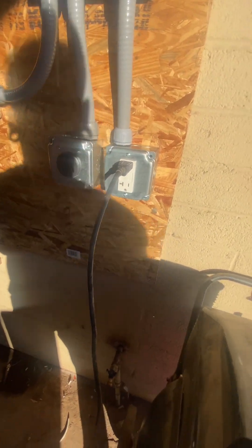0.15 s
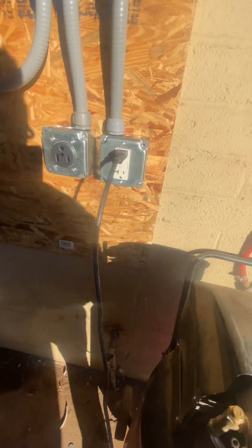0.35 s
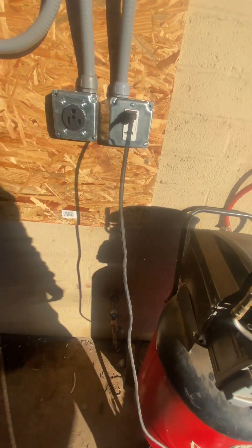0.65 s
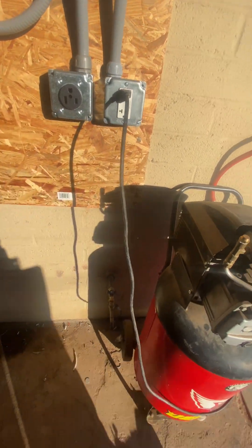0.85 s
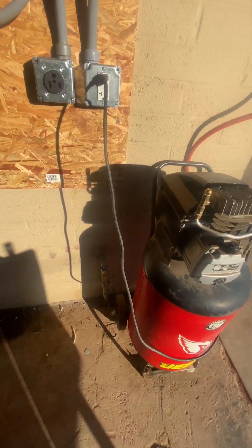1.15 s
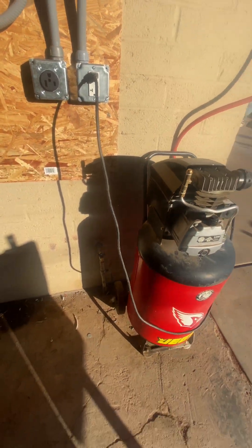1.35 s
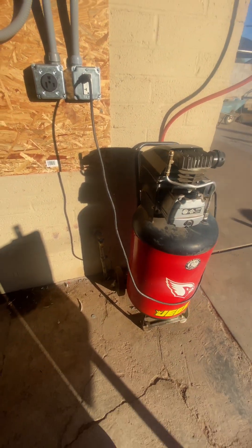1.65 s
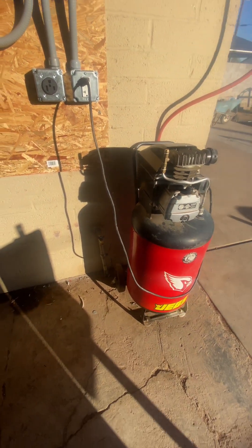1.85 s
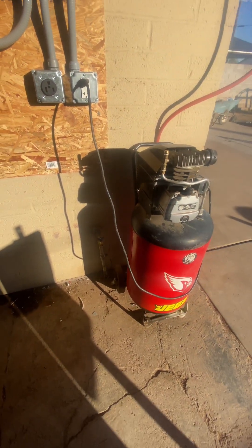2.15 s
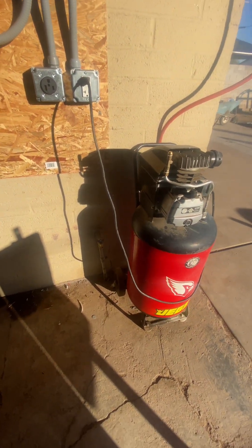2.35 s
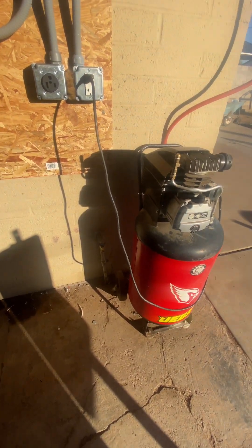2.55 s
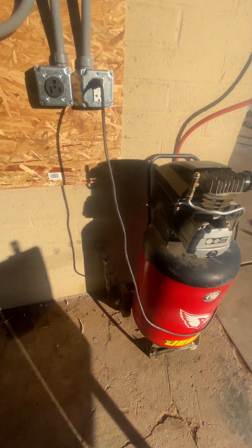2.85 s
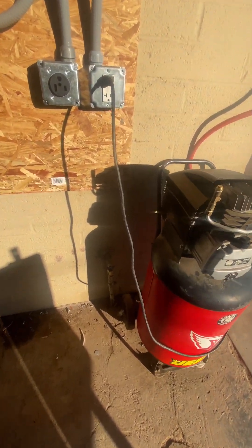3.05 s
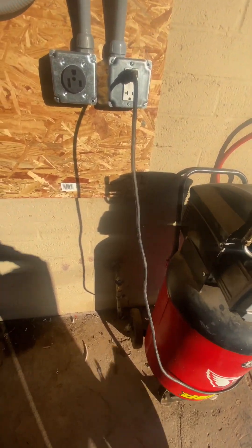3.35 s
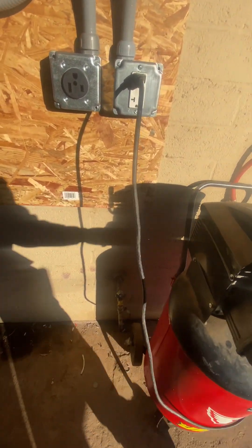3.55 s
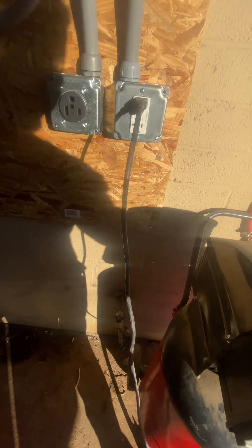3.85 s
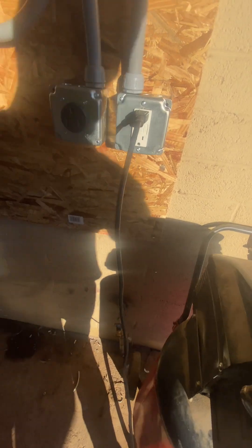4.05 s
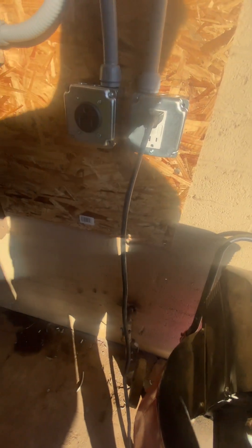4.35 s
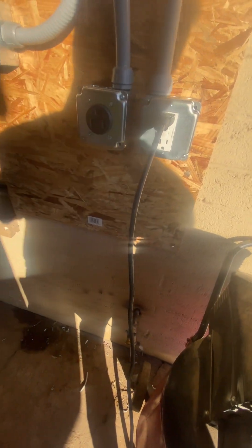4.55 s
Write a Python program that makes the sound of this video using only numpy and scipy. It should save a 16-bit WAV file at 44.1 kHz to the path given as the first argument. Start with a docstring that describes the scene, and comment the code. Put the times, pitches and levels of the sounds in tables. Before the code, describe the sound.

Continuous mechanical roar from a compressor against a hard wall, heard by a handheld microphone. Rapid pump pulses make a steady droning hum; valves rattle metallically and air hisses on top, with a faint thin whine beneath. The sound drops as the listener backs away, holds even, then swells again when they walk back close. A soft footstep is nearly buried.

```python
"""Piston air compressor in a garage

A small compressor runs steadily against a wall, 57 turns a second; one crank phase times its pulsed sounds.
Each turn brings three gulps of air (hum, buzz and rasp), seven blows that ring the metal head, a gush of
hiss and a singing outlet reed. A thin shaft whine, fan wash and one soft footfall lie beneath.
The listener stands by the wall socket, steps back, and returns to a slightly different place."""
import sys
import numpy as np
from scipy import signal
from scipy.fft import rfft, irfft, next_fast_len
from scipy.io import wavfile
from scipy.ndimage import uniform_filter1d, map_coordinates

SR = 44100
rng = np.random.default_rng(int(sys.argv[2]) if len(sys.argv) > 2 else 0)


def master_out(mix):
    """Clip the mix to full scale and print it as 16-bit PCM to the path in sys.argv[1]."""
    frames = np.transpose(np.atleast_2d(mix))
    ceiling = np.clip(frames, -1, 1)
    pcm = np.round(ceiling * 32767).astype(np.int16)
    wavfile.write(sys.argv[1], SR, pcm)


N = 207578
TIME = np.arange(N) / SR
TURNS_HZ = 56.88

# listener's walk: time_s, place (0 by the socket, 1 stepped back, 2 returned)
WALK = [(0, 0), (.28, 0.026), (.72, 0.48), (1.2, 0.76), (1.6, 0.83), (2.45, 0.96), (3.3, 1.58),
        (4.03, 1.903), (4.7, 1.79)]
# machine loudness, higher as the listener is nearer: time_s, level_db
LOUDNESS = [(0.12, -18.5), (0.25, -17.5), (0.75, -18.5), (1.2, -22), (2.88, -22.5), (3.24, -20),
            (4.15, -18.5), (4.6, -19.5)]
# gulps of air in each turn: at_turns, level_db
GULPS = [(0.96, 0), (.385, -4), (.66, -5)]


def gain_of(db):
    """Decibels to amplitude."""
    return 10 ** (np.asarray(db) / 20)


def evened(x):
    """Scales to rms 1."""
    return x / np.sqrt(np.mean(x ** 2) + 1e-20)


def levelled(x):
    """Holds the rms near 1 over a span of about ten turns."""
    span = round(10 * SR / TURNS_HZ)
    power = uniform_filter1d(uniform_filter1d(x ** 2, span), span)
    return x / np.sqrt(power + 1e-12)


def whitened(x, width_hz=260):
    """Evens out the broad colour of a sound and keeps its harmonics and rhythm."""
    spectrum = rfft(x, 2 * N)
    power = uniform_filter1d(abs(spectrum) ** 2, round(width_hz * 2 * N / SR))
    return irfft(spectrum / np.sqrt(abs(power) + 1e-9))[:N]


def follow(rows):
    """Breakpoints (time_s, value) joined into a curve at every sample."""
    return np.interp(TIME, *np.transpose(rows))


def read(hz, points_hz, values):
    """A spectrum joined by straight lines on a log-frequency axis."""
    return np.interp(np.log(hz + 1), np.log(points_hz), values)


def drift(rate_hz):
    """Slow random fluctuation of rms 1: noise low-passed near rate_hz."""
    size = next_fast_len(N, True)
    hz = np.fft.rfftfreq(size, 1 / SR)
    spectrum = rfft(rng.standard_normal(size)) / (1 + (hz / rate_hz) ** 4)
    return evened(irfft(spectrum, size)[:N])


def causal(db):
    """Minimum-phase response of a passive body with these gains."""
    log_gain = np.log(gain_of(np.r_[db, db[-2:0:-1]]))
    return np.exp(np.conj(signal.hilbert(log_gain)))[:len(db)]


def nearness():
    """Weight of each of the three places at every moment."""
    place = np.clip(follow(WALK), 0, 2)
    return np.maximum(1 - abs(place - np.arange(3)[:, None]), 0)


def stretches(count=8):
    """Equal-power fades between successive stretches of the walk."""
    along = np.clip(follow(WALK), 0, 2) / 2 * (count - 1)
    return np.sqrt(np.maximum(1 - abs(along - np.arange(count)[:, None]), 0))


def crank(wander_turns=0.00056):
    """Crank turns as they reach the ear: slightly unsteady, and later from farther away."""
    # distance from the pump: time_s, distance_m
    distance = [(0, .8), (.5, .98), (1, 1.16), (1.5, 1.26), (2, 1.28), (2.5, 1.16), (3, .96), (3.5, .8),
                (4, .68), (4.7, .57)]
    delay_s = (follow(distance) - distance[0][1]) / 343
    return TURNS_HZ * (TIME - delay_s) + wander_turns * drift(44)


def hum_level(bass_db=-19, hum_share=0.36, wall_db=5, wall_steepness=3.6):
    """Deep sound fills the garage, so it follows the loudness only in part and piles up by the wall."""
    by_wall = np.minimum(abs(follow(WALK) - 1), 1) ** wall_steepness
    return bass_db + hum_share * follow(LOUDNESS) + wall_db * by_wall


def footfall(at_s=0.82, length_s=0.097, step_db=-42, low_hz=70, high_hz=260):
    """A soft, dull step backwards: band-passed noise under a bell-shaped envelope."""
    band = signal.butter(2, [low_hz, high_hz], "band", fs=SR, output="sos")
    thud = signal.sosfilt(band, rng.standard_normal(N))
    return evened(thud) * gain_of(step_db) * np.exp(-((TIME - at_s) / length_s) ** 2)


def fan(fan_db=-42, closeness=0.34):
    """Broad noise wash of cooling air, following the hum level in part."""
    # fan spectrum: pitch_hz, relative_level_db
    fan_colour = [(20, -25), (40, -19), (80, -4.5), (200, -7), (400, -2), (750, -4.5), (1100, -2),
                  (2000, -11.5), (3500, -6), (8000, -72)]
    hz = np.fft.rfftfreq(N, 1 / SR)
    level_db = hum_level()
    wash = irfft(rfft(rng.standard_normal(N)) * gain_of(read(hz, *np.transpose(fan_colour))), N)
    return evened(wash) * gain_of(fan_db + closeness * (level_db - level_db.mean()))


def whine(turns, order=81, waver=0.4):
    """A thin, wavering sine that keeps step with the shaft."""
    # whine level: time_s, level_db
    whine_level = [(0, -47), (.3, -29), (.6, -31), (.95, -34), (1.3, -41), (3.5, -34), (4.05, -40),
                   (4.7, -34)]
    tone = (1 + waver * drift(8.9)) * np.sin(2 * np.pi * order * turns)
    return evened(tone) * gain_of(follow(whine_level))


def rasp(turns, rasp_db=-42, low_hz=500, high_hz=1150, lasts_turns=0.12, back_db=-12):
    """Each gulp tears at the intake with a decaying burst of noise, weaker where the listener steps back."""
    gate = sum(gain_of(db) * np.exp(-((turns - at) % 1) / lasts_turns) for at, db in GULPS)
    band = signal.butter(3, [low_hz, high_hz], "band", fs=SR, output="sos")
    noise = signal.sosfilt(band, gate * rng.standard_normal(N))
    return evened(noise) * gain_of(rasp_db + back_db * nearness()[1])


def dead_spots(hz, dead_width_hz=45):
    """Dips in dB where one pitch of the hum meets its own echo out of step."""
    # dead spots: time_s, half_width_s, pitch_hz, depth_db
    spots = [(.1, 0.16, 457, -12), (.63, 0.13, 736, -4), (1.25, 0.11, 683, -7), (1.4, 0.46, 853, -1),
             (2, .4, 836, -6.5), (3.3, 0.3, 377, -10), (3.57, 0.24, 442, -9), (3.57, 0.16, 580, -9)]
    return sum(db * np.exp(-((TIME - s) / width_s) ** 2 - ((hz - at_hz) / dead_width_hz) ** 2)
               for s, width_s, at_hz, db in spots if abs(hz - at_hz) < 2 * dead_width_hz)


def hum(turns, scatter_rad=.24, smear_rad=.003, waver=0.049, flutter=0.026, order=16):
    """The pump gulps air; muffler, tank and wall shape and smear the pulses differently at each place."""
    # harmonics at each place: multiple of the turning rate, relative_level_db
    at_socket = [(1, -14.5), (2, -13.5), (3, -10), (4, -12.5), (5, -20), (6, -2), (7, -30), (8, -8),
                 (9, -10.5), (10, -4), (11, -12.5), (12, -5), (13, -15), (14, -12.5), (15, -4), (16, -13),
                 (17, -19), (18, -28), (19, -20), (20, -26), (21, -15.5), (22, -15), (23, -20), (24, -25),
                 (25, -18), (26, -29), (27, -18.5)]
    stepped_back = [(1, -13.5), (2, -21.5), (3, -6), (4, -2), (5, -10), (6, -2.5), (7, -11), (8, 3),
                    (9, -4), (10, -5.5), (11, -21), (12, -11), (13, -5.5), (14, -7.5), (15, -3),
                    (16, -11.5), (17, -22), (18, -4.5), (19, -15.5), (20, -17), (21, -24), (22, -16.5),
                    (23, -13), (24, -20), (25, -17), (26, -28), (27, -15)]
    returned = [(1, -9.5), (2, -6), (3, -6.5), (4, -6), (5, -10), (6, 4), (7, -13.5), (8, -9), (9, -0.5),
                (10, -3.5), (11, -1), (12, 1.5), (13, -2.5), (14, -1.5), (15, -9), (16, -0.5), (17, -2.5),
                (18, -9.5), (19, -25), (20, -3), (21, 0.5), (22, -9.5), (23, -5), (24, -17), (25, -9),
                (26, -22), (27, -7)]
    # level of the buzz, beamed by the intake towards the way back: time_s, level_db
    buzz_level = [(0, -33.5), (.5, -37), (1.2, -39.5), (2.3, -39.5), (2.9, -35), (3.4, -31), (4.1, -31.5),
                  (4.7, -31.5)]
    places_db = np.array([at_socket, stepped_back, returned])[:, :, 1]
    near, tones = nearness(), []
    for k, db in enumerate(places_db.T, 1):
        pulses = sum(gain_of(gulp_db) * np.exp(-2j * np.pi * k * at) for at, gulp_db in GULPS)
        echoes = scatter_rad * np.sqrt(k) * rng.standard_normal(3) @ near  # short waves scatter most
        phase = np.angle(pulses) + echoes - smear_rad * k ** 2  # the muffler lets high harmonics out last
        size = gain_of(db @ near + dead_spots(k * TURNS_HZ)) * (1 + waver * drift(9.1))
        tones.append(size * np.cos(2 * np.pi * k * turns + phase))
    # low harmonics spread all round; higher ones beam from the intake as a buzz
    low = levelled(sum(tones[:order])) * gain_of(hum_level())
    buzz = levelled(sum(tones[order:])) * gain_of(follow(buzz_level))
    return (low + buzz) * (1 + flutter * drift(39))


def reed(turns, reed_hz=10318, opens_turns=.4, lasts_turns=0.64, scatter_rad=.2, swell_db=1.5):
    """The outlet reed sings while air passes it, starting afresh in every turn and dying slowly."""
    # tone before the head is levelled, level_db: by the socket, stepped back, returned
    places_db = [-12.5, -18.5, -5.5]
    turn, angle = np.divmod(turns - opens_turns + 1, 1)
    phase, force_db = rng.standard_normal((int(turn.max()) + 1, 2))[turn.astype(int)].T
    lift = np.sin(np.pi * np.minimum(angle / lasts_turns, 1) ** .5) ** 2
    tone = np.sin(2 * np.pi * reed_hz * angle / TURNS_HZ + scatter_rad * phase)
    swell = gain_of(0.5 * force_db + swell_db * drift(6.4))
    return evened(lift * swell * tone) * gain_of(places_db @ nearness())


def gush(turns, corner_hz=8000):
    """Air hisses through the valves: high-passed noise gated by crank angle."""
    # rush of air through one turn: at_turns, relative_level_db
    rush = [(0, -8.5), (.25, -4.5), (.31, -4.5), (.46, -9), (.57, -1.5), (.62, -12.5), (.83, -11), (1, -6)]
    highpass = signal.butter(1, corner_hz, "high", fs=SR)
    hiss = signal.lfilter(*highpass, rng.standard_normal(N))
    return evened(hiss * gain_of(np.interp(turns % 1, *np.transpose(rush))))


def metal(t60_s, centre_hz, octaves):
    """The dense decaying ring of cast metal, strongest around one pitch."""
    t, hz = np.arange(2048) / SR, np.fft.rfftfreq(2048, 1 / SR)
    focus_db = -20 * np.log10(1 + (np.log2((hz + 1) / centre_hz) / octaves) ** 2 / 2)
    grains = rng.choice([-1., 1.], len(t)) * gain_of(-60 * t / t60_s)
    ring = irfft(rfft(grains) * causal(focus_db))
    return ring / np.linalg.norm(ring)


def blows(turns, uneven_db=1.0):
    """Valves and piston strike at set crank angles, never quite alike; the ring varies with direction."""
    # blows: at_turns, relative_level_db, ring_t60_s, timing_scatter_us, pitch_hz, spread_octaves
    strikes = [(0.041, -6.5, 0.023, 6.4, 7700, 0.77), (.295, -3, .014, 13, 7350, 0.55),
               (0.344, -5.5, 0.029, 17.4, 4520, .45), (.39, -9, 0.031, 27, 2330, 0.82),
               (.6, -2, 0.018, 12.4, 6330, 0.51), (0.656, -5, 0.028, 12, 4860, 0.51),
               (.78, -7, 0.034, 25, 2500, 0.98)]
    out, around, fades = np.zeros(N), np.arange(-12, 13), stretches()
    for angle, db, t60_s, scatter_us, centre_hz, octaves in strikes:
        at = np.interp(np.arange(max(angle, .03), turns[-1], 1), turns, np.arange(N))
        late, force = rng.standard_normal((2, len(at)))
        at = at + late * scatter_us * SR / 1e6
        # sinc pulses place each blow between samples
        index, train = at.astype(int)[:, None] + around, np.zeros(N + 64)
        pulses = np.sinc(index - at[:, None]) * gain_of(db + uneven_db * force)[:, None]
        np.add.at(train, index, pulses)
        for fade in fades:
            out += signal.oaconvolve(train[:N] * fade, metal(t60_s, centre_hz, octaves))[:N]
    return evened(out)


def walls(x, echo=0.19, shift_s=0.000504, count=5):
    """Floor, wall and tank echo the clatter; the paths slide against each other as the listener moves."""
    out, near = x.copy(), nearness()
    for delay_s in np.geomspace(.0016, .006, count):
        path_s = delay_s + shift_s * (rng.standard_normal(3) @ near + 0.09 * drift(1.19))
        out += echo * map_coordinates(x, [(TIME - path_s) * SR], order=3)
    return out


def fin(drive, centre_hz, width_hz, level_db, slope_db, lobe_at, lobe_spacing, echo):
    """A broad resonance rung by the clatter; with its wall echo it forms lobes that the walk crosses."""
    edges_hz = [centre_hz - width_hz / 2, centre_hz + width_hz / 2]
    band = signal.butter(2, edges_hz, "band", fs=SR, output="sos")
    place = follow(WALK)
    lobes = abs(1 + echo * np.exp(2j * np.pi * (place - lobe_at) / lobe_spacing))
    return levelled(signal.sosfilt(band, drive)) * lobes * gain_of(level_db + slope_db * place)


def clatter(turns, hiss_db=-2.5, head_db=-0.5):
    """Blows and hiss ring the head and its fins; the resonances beam differently towards each place."""
    # broad colour: pitch_hz, socket_db, back_db, returned_db
    colour = np.array([(1335, -26.5, -33, -25), (1642, -4.5, -1, -4.5), (2200, -5, -3, -6),
                       (2440, -3, -4, 1), (2890, -8.5, -5.5, -5), (3420, -5.5, -3, -8),
                       (3740, -1, 3.5, 3.5), (5300, 3.5, -1.5, 0.5), (5700, -4.5, 2, -2), (7800, 1, -2, -1),
                       (10200, -2.5, 2, -1), (12750, -6.5, -12.5, -8), (13300, -12.5, -15, -13),
                       (15300, -26, -29, -25.5)])
    # resonances of head, fins and pipe: pitch_hz, width_hz, socket_db, back_db, returned_db
    modes = [(3630, 220, 2.5, -2, 4.5), (4600, 230, 1, 2, 2), (5530, 190, -2, 5.5, 5.5),
             (6760, 21, 7, 4.5, 5), (8350, 160, 2, 7.5, 6.7), (9730, 70, 8, 3.7, 11),
             (10430, 110, 9, 0.5, 5.5), (10300, 99, -5, 9.5, 6.5), (11430, 79, 7, 3.3, 3.5),
             (12500, 70, -3, 3.5, 5.2), (13650, 200, 8, 4, 5.8)]
    # ringing fins: pitch_hz, width_hz, level_db, slope_db per place, lobe_at (place),
    # lobe_spacing (places), wall_echo (0-1)
    fin_rows = [(3755, 540, -18, -1, 0.29, 1.36, 0.73), (5790, 340, -15, -4.5, 0.012, 0.497, 1)]
    drive = whitened(walls(blows(turns) + gain_of(hiss_db) * gush(turns)))
    hz, head = np.fft.rfftfreq(8192, 1 / SR), np.zeros(N)
    for place, near in enumerate(nearness()):
        peaks = sum((gain_of(heights_db[place]) ** 2 - 1) / (1 + (2 * (hz - f) / width_hz) ** 2)
                    for f, width_hz, *heights_db in modes)
        broad_db = read(hz, colour[:, 0], colour[:, place + 1])
        db = broad_db + 10 * np.log10(np.maximum(1 + peaks, .1))
        head += near * evened(signal.oaconvolve(drive, irfft(causal(db)))[:N])
    head = levelled(head + reed(turns)) * gain_of(head_db)
    return (head + sum(fin(drive, *row) for row in fin_rows)) * gain_of(follow(LOUDNESS))


def scene():
    """One crank drives hum, rasp, clatter and whine; fan and footfall run free."""
    turns = crank()
    return (fan() + footfall() + whine(turns) + rasp(turns) + hum(turns) + clatter(turns))[None]


def record(dry, cutoff_hz=15500):
    """The recorder's band limit: a steep linear-phase low-pass."""
    lowpass = signal.firwin(511, cutoff_hz, window=("kaiser", 9), fs=SR)
    return signal.oaconvolve(dry, lowpass[None], "same")


dry = scene()
out = record(dry)
master_out(out)
```